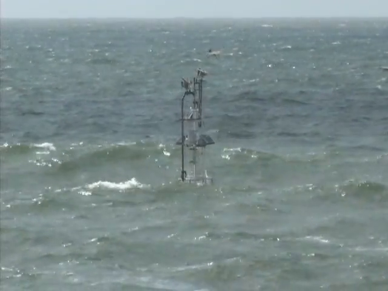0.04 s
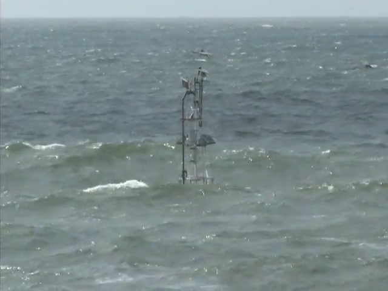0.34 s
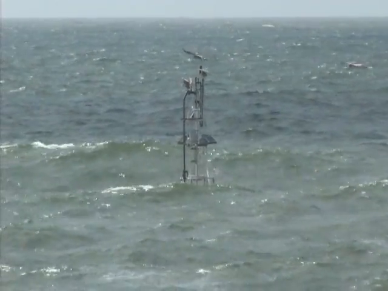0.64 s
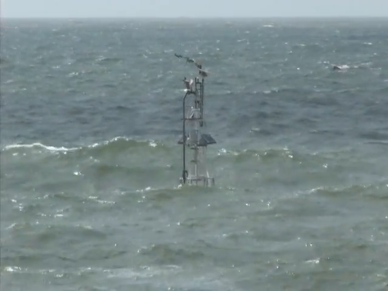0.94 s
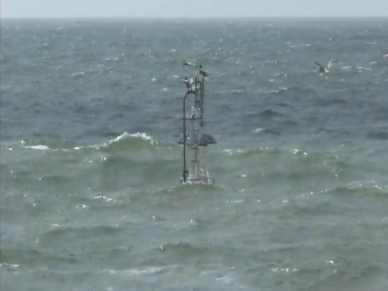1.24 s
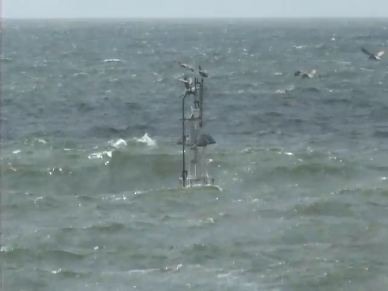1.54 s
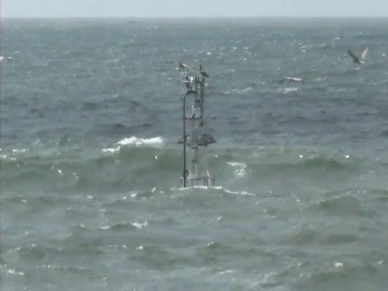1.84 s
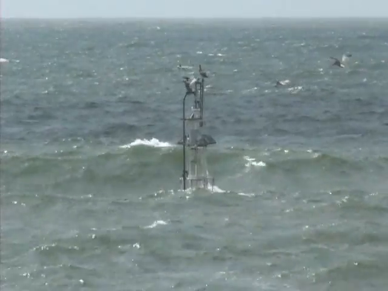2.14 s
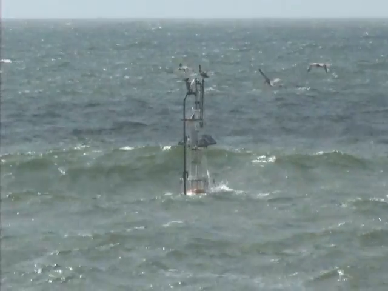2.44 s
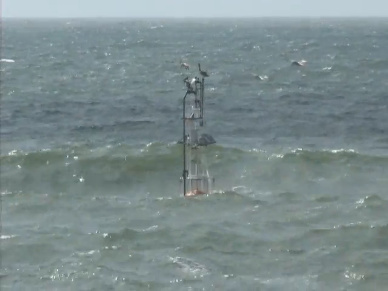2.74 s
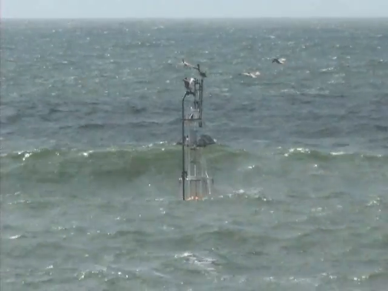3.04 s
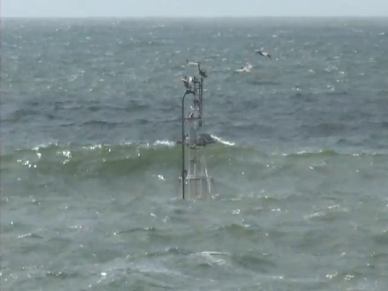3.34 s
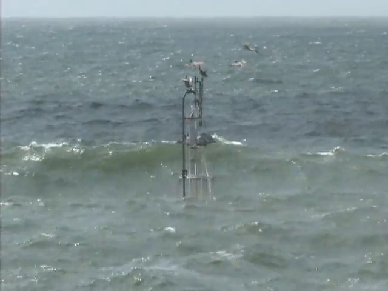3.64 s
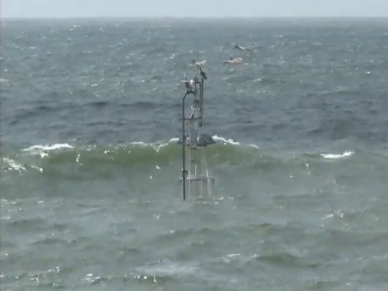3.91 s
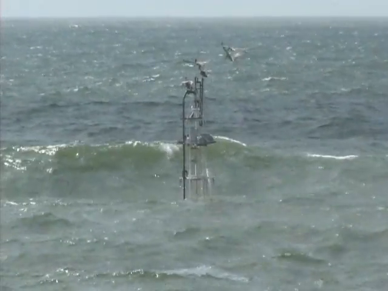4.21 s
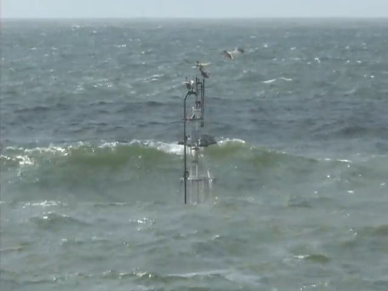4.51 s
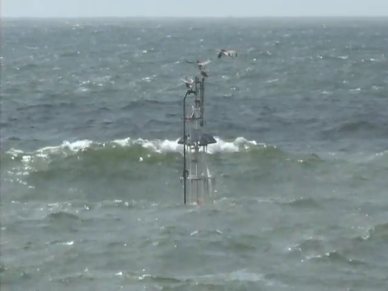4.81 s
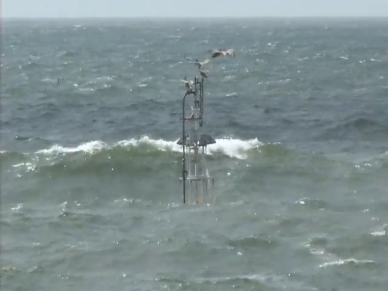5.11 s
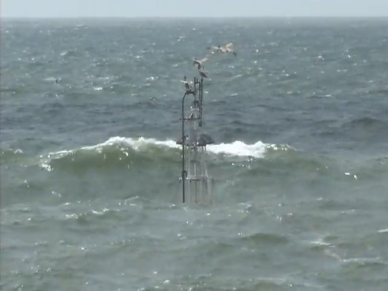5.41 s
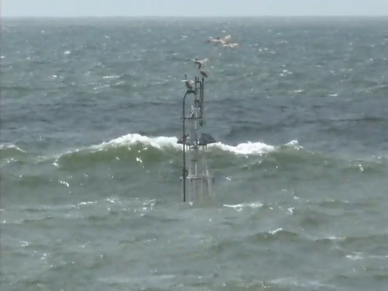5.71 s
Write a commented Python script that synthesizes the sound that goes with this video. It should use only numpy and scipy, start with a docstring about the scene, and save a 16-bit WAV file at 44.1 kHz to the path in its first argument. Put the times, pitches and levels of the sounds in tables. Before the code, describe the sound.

Waves break and wash on a rough sea behind heavy, uneven wind rumbling and thumping across the microphone.

```python
"""On a shore above a rough sea, stereo microphone out in a strong wind. From the start, turbulence
buffets its two ports with a deep, uneven rumble, and big eddies thump across them, hardest about 1 s in.
Farther off, waves break and wash out throughout: churning water with bubbles, hissing foam and spray.
Nearer splashes come from left and right until about 4.5 s; near 3 s and just after 4 s,
blown drops tick faintly close to the microphone. Wind and surf carry on to the end."""
import sys
import numpy as np
from scipy import signal
from scipy.fft import rfft, irfft
from scipy.io import wavfile
from scipy.ndimage import uniform_filter1d

SR = 44100
rng = np.random.default_rng(int(sys.argv[2]) if len(sys.argv) > 2 else 0)


def store_pcm(level_fs):
    """Save levels as 16-bit WAV."""
    pcm = np.round(np.clip(level_fs, -1, 1) * 32767).astype(np.int16)
    wavfile.write(sys.argv[1], SR, np.atleast_2d(pcm).T)


N = 262836
T = np.arange(N) / SR
HZ = np.maximum(np.arange(N // 2 + 1) * SR / N, 1)

# Levels are relative. Side is left minus right; likeness of left and right runs from 0 to 1.
# strength of the wind at the microphone: t/s, rumble level/dB, flutter level/dB
WIND_STRENGTH = [(0, -18, -21), (.23, -17.5, -28.5), (.53, -15.5, -22), (1.12, -14.5, -24.5),
                 (1.21, -19, -27), (1.42, -21, -24), (1.57, -16, -23), (2.26, -18.5, -23),
                 (2.58, -12, -25.5), (2.69, -15.5, -25), (2.93, -17, -23.5), (3.28, -18.5, -25.5),
                 (3.7, -16, -23.5), (4.2, -16.5, -26), (4.94, -15.5, -25.5), (5.07, -23, -28),
                 (5.26, -14.5, -25), (5.95, -14.5, -25)]
# buffeting at the two ports: f/Hz, level/dB, side/dB, likeness, lead of the right port/rad
BUFFET_SPECTRUM = [(2, -60, 0, .6, -33), (22.5, -24, 14, 0.7, 0.2), (40.5, -3, -3, 0.95, 0.85),
                   (62.6, -1.5, 7.5, 0.5, 0.3), (82.5, 2, -7.5, 0.48, 1.5), (98.5, 0.5, 0, 0.26, 2.26),
                   (130.5, 1, -2, 0.74, 2.5), (167.8, -7, -3.5, 0.66, 2), (224.5, -14, -3.5, 0.6, 3),
                   (320, -23.5, -3, 0.7, 3), (445, -35.5, -3, 0.88, 1.5), (1070, -46.5, 5.5, 0.8, 3),
                   (4080, -82, 9, 0, -7)]
# the biggest eddies to hit the microphone: t/s, level/dB, f/Hz of the swing at its peak
BIG_EDDIES = [(0.055, -7.5, 86), (0.373, -8, 113), (.754, -7, 98), (.892, -6.5, 92), (1.007, -2, 87),
              (1.056, -5.5, 92), (1.119, -7, 82), (1.53, -7, 83), (1.648, -9, 101), (1.81, -7.5, 160),
              (1.981, -8.5, 98), (2.104, -3, 93), (2.354, -7.5, 97), (2.508, -7, 89), (2.559, -7, 90),
              (2.623, -5, 102), (3.061, -6.5, 102), (3.15, -7, 117), (3.475, -3.5, 108), (3.655, -8.5, 122),
              (3.74, -4, 101), (3.871, -6, 108), (3.969, -5, 125), (4.218, -9, 94), (4.413, -2.5, 91.5),
              (4.467, -5, 104), (4.766, -4, 81), (4.837, -7, 116), (5.15, -5.5, 96), (5.349, -7, 116),
              (5.712, -6.5, 116), (5.784, -6.5, 87)]
# colour of the surf from the shore: f/Hz, level/dB, likeness, side/dB
SURF_SPECTRUM = [(151, 3.5, 0.1, -20), (333, 4, 0, 3), (450, -3.5, 0.1, 5), (540, -0.6, 0, -0.5),
                 (754, -2.6, 0.23, -1), (1020, -4.5, 0.08, 2), (1300, -7.5, 0.53, 0),
                 (1980, -10, 0.17, 0.2), (3150, -12, 0.24, 0), (6400, -14.5, 0.41, 0.7),
                 (7670, -16, 0.26, 1), (9520, -21, 0, 0), (12600, -28.5, 0, 0.5)]
# waves breaking farther off: t/s of the peak, level/dB, build-up/s, wash-out/s, extra foam/dB, side/dB
BREAKERS = [(.3, -39, .6, 0.19, 1, 1.5), (.5, -41.5, 0.07, 0.037, 2.5, 0.5), (.74, -46.5, 0.15, .12, 1, 1),
            (.97, -44.5, 0.12, 0.1, 2, 0), (1.44, -41.5, 0.14, 0.14, 0, -0.5),
            (1.72, -46, 0.11, .2, -0.5, 0.5), (2.08, -47.5, .11, 0.083, 0.5, -3),
            (2.36, -43.5, 0.13, 0.13, 0, 1.5), (2.53, -45.5, 0.067, 0.047, -.3, 3),
            (3.01, -47, 0.2, 0.097, 0, 0), (3.42, -46.5, 0.13, 0.076, 1, 0),
            (3.66, -46, 0.079, .13, 1.5, -4), (4.03, -53.5, 0.093, 0.1, 4.5, -6),
            (4.39, -46, 0.15, 0.07, 1.7, 2), (5.1, -44.5, 0.1, 0.22, -2, 4),
            (5.67, -46, 0.15, 0.087, -0.5, 2)]
# nearer splashes: t/s, level/dB, centre f/Hz, width/octaves, rise/s, side/dB
NEAR_SPLASHES = [(.27, -35.5, 480, 0.59, .05, 8), (.35, -42, 1550, .28, .035, 3),
                 (1.44, -38.5, 930, 0.2, 0.046, -1), (2.02, -41, 776, .2, 0.019, -14),
                 (2.545, -42, 900, 1.1, 0.011, 2), (2.931, -37, 3500, 0.7, .004, 0),
                 (2.99, -37.3, 1600, .75, .036, 20), (2.985, -36.5, 674, 0.21, 0.022, -1),
                 (3.64, -41, 5370, .7, 0.02, -5), (4.42, -42.5, 5800, 0.47, 0.024, 0)]
# drops of spray landing close by: t/s, level/dB
CLOSE_DROPS = [(2.9302, -37), (4.0228, -36), (4.093, -31)]


def wind(rumble_db=0.12, flutter_db=-0.08, split_hz=170, gust_db=1.06, gusts_per_s=18, sway_db=0.5,
         shelter_db=-4, shelter_s=0.0079):
    """Turbulence sweeps the right port, then the left: deep rumble and finer flutter in quick gusts."""
    rumble_level, flutter_level = curves(WIND_STRENGTH)
    # while a big eddy covers the ports, it takes the place of the rumble
    covered = sum(np.exp(-((T - s) / shelter_s) ** 2) for s, _, _ in BIG_EDDIES)
    rumble_level = rumble_level + shelter_db * covered
    colour_db, side_db, likeness, lead = spectra(BUFFET_SPECTRUM)
    ports = undb(colour_db) * pan(side_db) * np.array([np.exp(-1j * lead), np.ones(len(HZ))])
    pressure = noise_pair(likeness) * ports
    lows = 1 / (1 + (HZ / split_hz) ** 8)
    rumble = steady(irfft(pressure * lows, N)) * undb(rumble_level + rumble_db)
    flutter = steady(irfft(pressure * (1 - lows), N)) * undb(flutter_level + flutter_db)
    gusts = undb(gust_db * walk(gusts_per_s))
    return (rumble + flutter) * gusts * pan(sway_db * walk(5.4))


def eddies(gain_db=0.5, rise_s=0.0097, fall_s=0.012, crossing_s=0.0025, side_db=-5.5, slowing=0.5):
    """A big eddy thumps the right port, then the left: a brief pressure swing that slows as it fades."""
    out = np.zeros((2, N))
    for (s, db, hz), phase in zip(BIG_EDDIES, rng.random(len(BIG_EDDIES))):
        near = np.abs(T - s) < .06
        t = T[near] - s - np.array([[crossing_s], [0]])
        envelope = np.exp(-(t / np.where(t < 0, rise_s, fall_s)) ** 2)
        cycles = hz * t * (1 - slowing * np.tanh(t / fall_s) / 2)
        out[:, near] += undb(db + gain_db) * envelope * np.sin(2 * np.pi * (cycles + phase))
    return out * pan(side_db)


def surf(churn_db=4.5, wash_db=0.23, foam_db=-3.5, churn_hz=1150, foam_hz=3600, flicker_db=0.46,
         bubble_db=-13, spray_db=-16, churn_side_db=0.5, foam_side_db=-1.6):
    """Water breaking below the shore: low bubbling churn, a broad wash, foam fizzing with spray."""
    colour_db, likeness, lean_db = spectra(SURF_SPECTRUM)
    bubbles = ringing_grains(379, 2520, cycles=12.7, spread_db=1.5, glide=0.28, count=2600)
    spray = ringing_grains(5500, 11000, cycles=4, spread_db=5.5, glide=0, count=1500)
    water = noise_pair(likeness) + rfft(undb(bubble_db) * bubbles + undb(spray_db) * spray)
    water = water * undb(colour_db) * pan(lean_db)
    churn_band = 1 / (1 + (HZ / churn_hz) ** 4)
    foam_band = 1 / (1 + (foam_hz / HZ) ** 4)
    parts = [(churn_band, swell(linger=1.35) + churn_db, churn_side_db),  # churning outlasts the wash
             (1 - churn_band - foam_band, swell() + wash_db, 0),
             (foam_band, swell(foamy=True) + foam_db, foam_side_db)]
    # all the water surges together, and each part flickers a little on each side
    out, surge = 0, walk(34)
    for band, db, side_db in parts:
        flicker = flicker_db * (surge + np.array([walk(14), walk(21.7)]))
        out = out + unit(irfft(water * band, N)) * undb(db + flicker) * pan(side_db)
    return out


def swell(linger=1, foamy=False, sea_db=-47.5, sea_side_db=2.5):
    """Left and right level/dB of the open sea plus the waves, each building up and washing out."""
    power = (undb(sea_db) * pan(sea_side_db)) ** 2
    for s, db, build_s, out_s, foam_db, side_db in BREAKERS:
        envelope = np.exp(-((T - s) / np.where(T < s, build_s, out_s * linger)) ** 2)
        power = power + envelope * (undb(db + foamy * foam_db) * pan(side_db)) ** 2
    return 10 * np.log10(power)


def ringing_grains(lo_hz, hi_hz, cycles, spread_db, glide, count):
    """Bubbles or droplets scattered across the surf: each rings a few cycles and may rise in pitch."""
    out = np.zeros((2, N))
    for when, pitch, size, side in rng.random((count, 4)):
        hz, start = lo_hz * (hi_hz / lo_hz) ** pitch, int(when * N)
        life_s = cycles / hz
        t = T[:min(int(life_s * SR) + 2, N - start)]
        decay = np.exp(-np.log(100) * t / life_s)
        ring = np.sin(2 * np.pi * hz * t * (1 + glide * t / life_s / 2)) * decay
        gain = undb(-spread_db * np.log(1 - .99 * size))  # many faint, a few loud
        out[:, start:start + len(t)] += gain * np.sqrt([[side], [1 - side]]) * ring
    return unit(out)


def splashes(gain_db=-1, rough_db=1.0, tail_ratio=1.6):
    """Crests collapse nearer the microphone: each a quick rush of water from its own direction."""
    out = 0
    for s, db, hz, octaves, rise_s, side_db in NEAR_SPLASHES:
        band = np.exp(-.5 * (np.log2(HZ / hz) / octaves) ** 2)
        rush = unit(irfft(noise_pair(0.2) * band, N))
        envelope = np.exp(-((T - s) / np.where(T < s, rise_s, tail_ratio * rise_s)) ** 2)
        out = out + rush * envelope * undb(db + gain_db + rough_db * walk(110)) * pan(side_db)
    return out


def drops(gain_db=-4.5, centre_hz=6500, decay_s=.0008):
    """Blown drops tick faintly close to the microphone."""
    ticks = sum(undb(db + gain_db) * (T >= s) * np.exp(-np.abs(T - s) / decay_s)
                for s, db in CLOSE_DROPS)
    band = np.exp(-np.log2(HZ / centre_hz) ** 2)
    return ticks * unit(irfft(noise_pair(.3) * band, N))


def undb(db):
    """Decibels to gain."""
    return 10 ** (np.asarray(db) / 20)


def unit(x):
    """Scale to rms 1."""
    return x / np.sqrt(np.mean(x ** 2))


def curves(table):
    """The columns of a time table, at every sample."""
    s, *columns = np.transpose(table)
    return [np.interp(T, s, c) for c in columns]


def spectra(table):
    """The columns of a frequency table, at every frequency."""
    hz, *columns = np.transpose(table)
    return [np.interp(np.log(HZ), np.log(hz), c) for c in columns]


def pan(side_db):
    """Left and right gains of constant power."""
    gains = undb(np.array([[.5], [-.5]]) * side_db)
    return gains / np.sqrt(np.mean(gains ** 2, axis=0))


def walk(per_s):
    """Random levels, each held 1 / per_s seconds, smoothed twice; rms 1."""
    hold = max(int(SR / per_s), 1)
    steps = np.repeat(rng.standard_normal(N // hold + 1), hold)
    return unit(uniform_filter1d(uniform_filter1d(steps, hold), hold)[:N])


def noise_pair(likeness):
    """Spectra of left and right white noises that are partly the same."""
    mid, side = rfft(rng.standard_normal((2, N)))
    likeness = np.clip(likeness, 0, .98)
    mid, side = mid * np.sqrt((1 + likeness) / 2), side * np.sqrt((1 - likeness) / 2)
    return np.array([mid + side, mid - side])


def steady(x, span_s=0.11):
    """Take the slow swells out of a stereo noise; rms near 1."""
    size = int(span_s * SR)
    power = uniform_filter1d(uniform_filter1d(np.mean(x ** 2, axis=0), size), size // 2)
    return x / np.sqrt(np.maximum(power, 1e-12))


def scene():
    """Wind right on the microphone, the sea behind it."""
    return wind() + eddies() + surf() + splashes() + drops()


def record(dry, top_hz=12400):
    """The recorder rounds the very highest peaks and cuts the top of the treble."""
    rounded = dry / (1 + dry ** 8) ** (1 / 8)
    return signal.sosfilt(signal.ellip(10, .1, 80, top_hz, fs=SR, output="sos"), rounded)


dry = scene()
out = record(dry)
store_pcm(out)
```